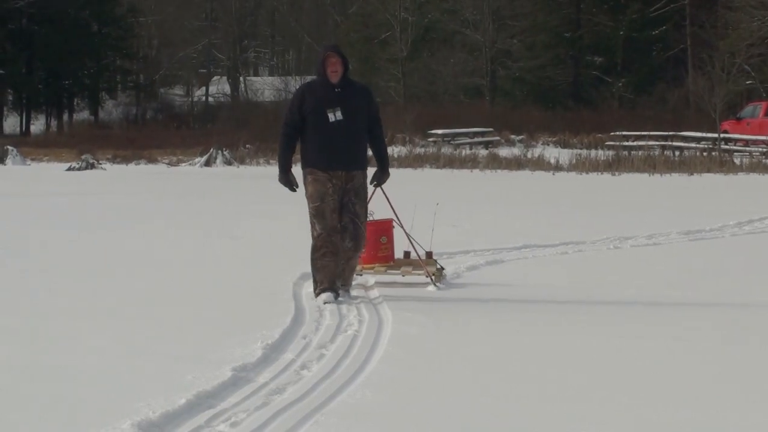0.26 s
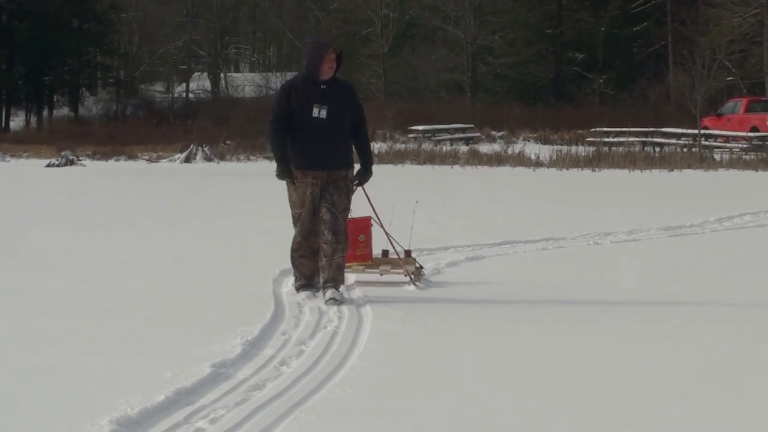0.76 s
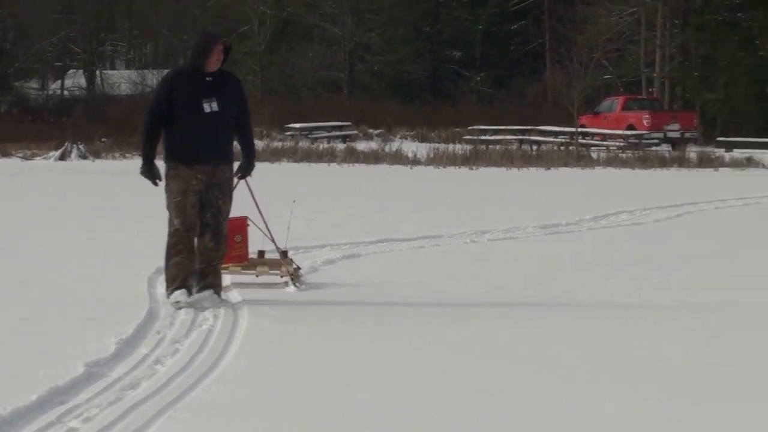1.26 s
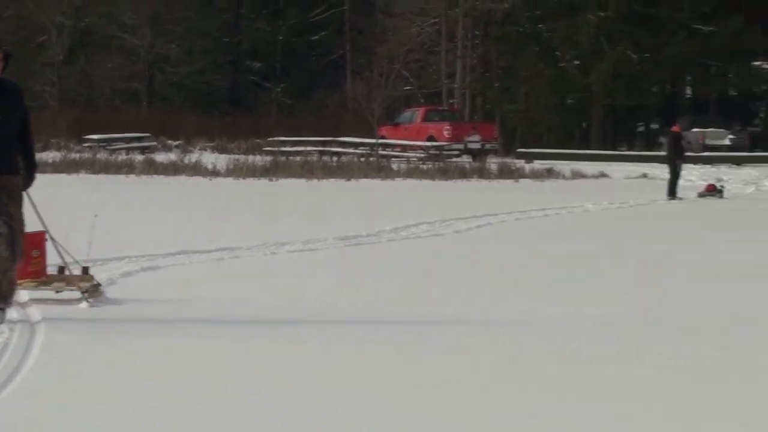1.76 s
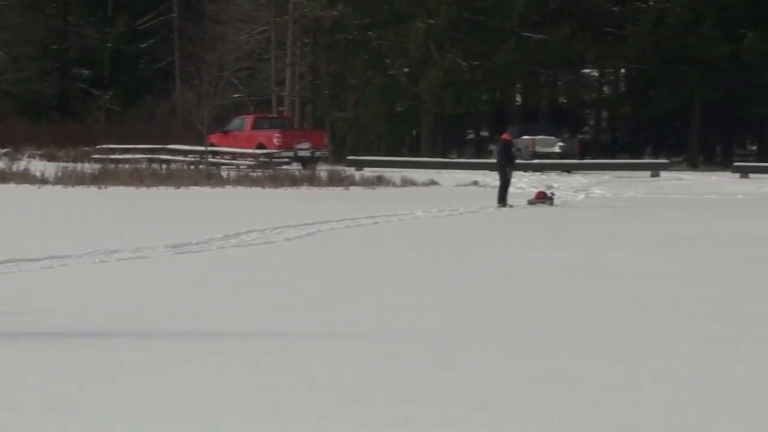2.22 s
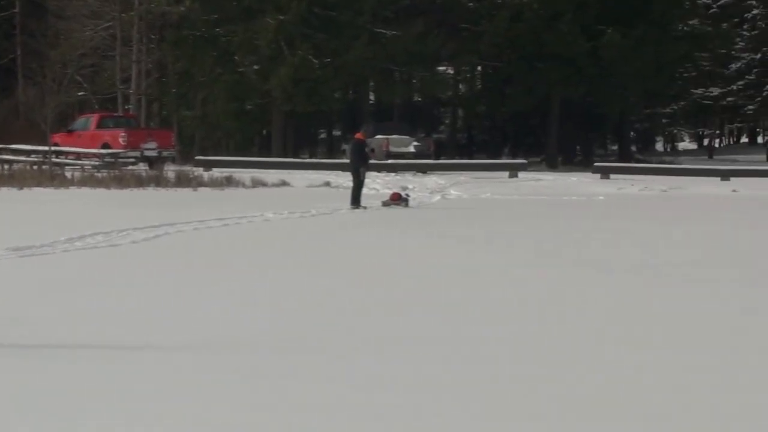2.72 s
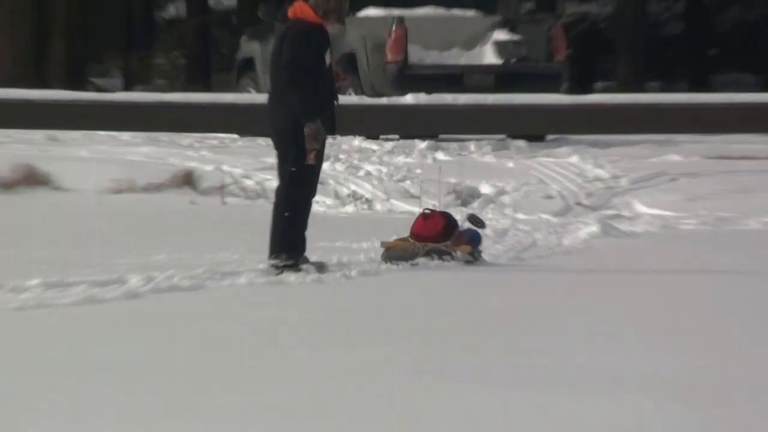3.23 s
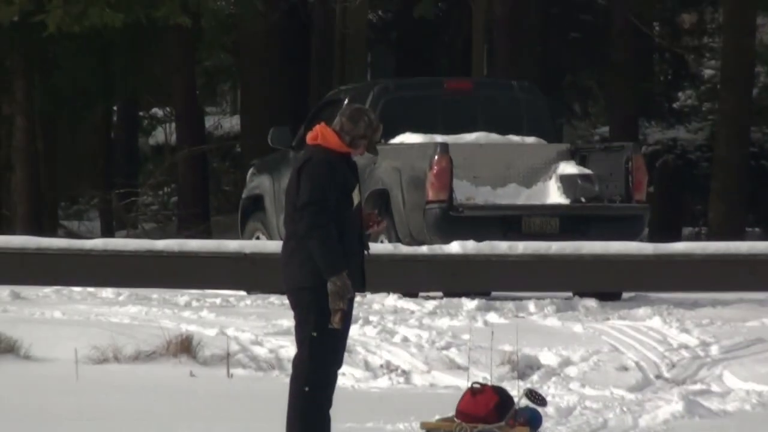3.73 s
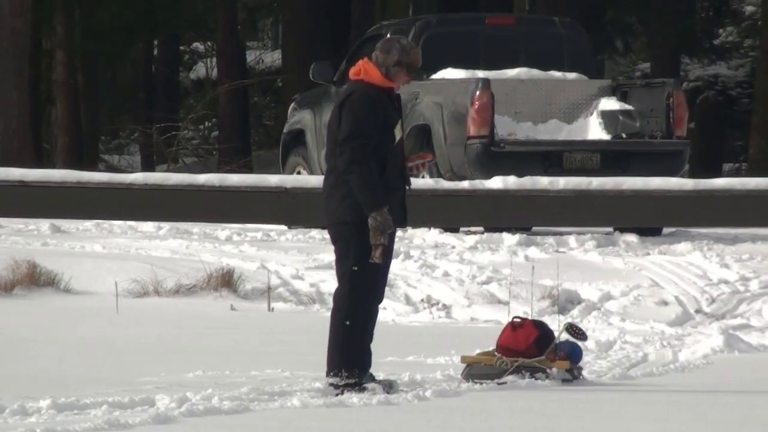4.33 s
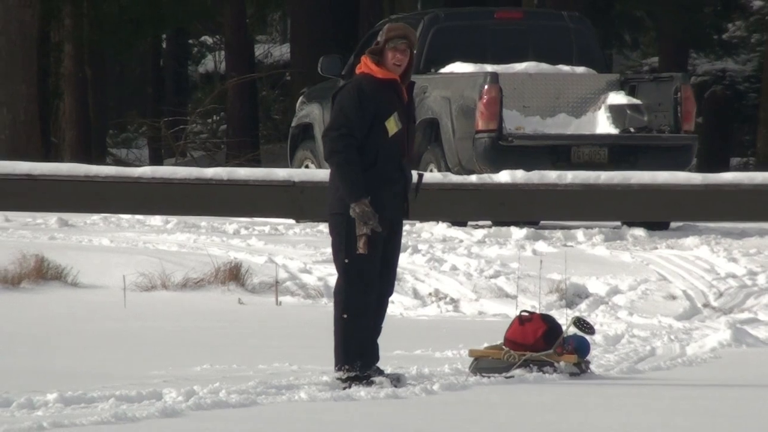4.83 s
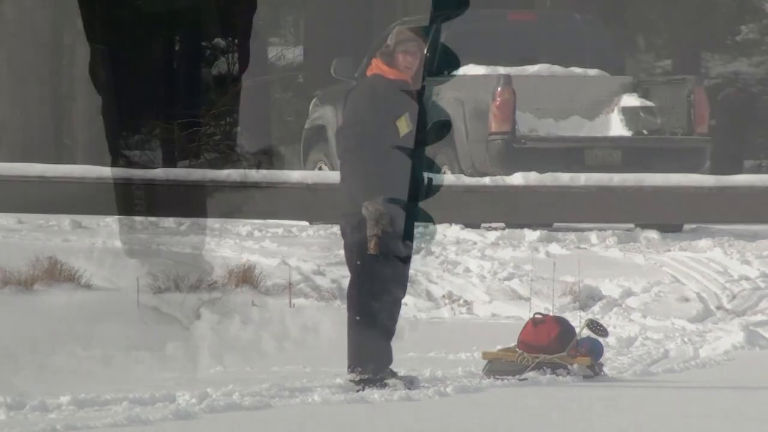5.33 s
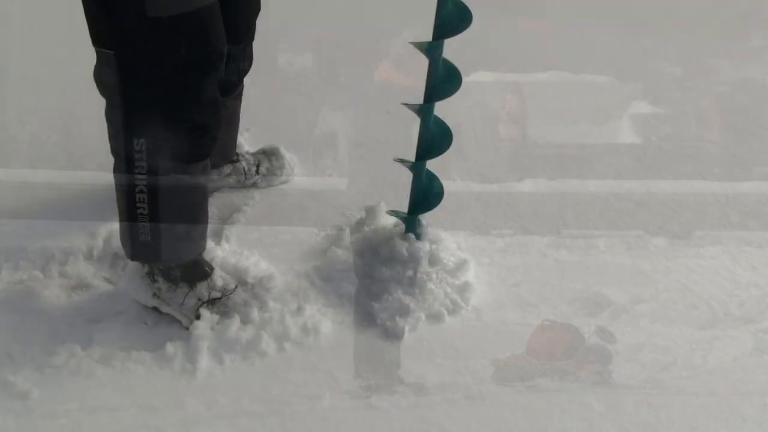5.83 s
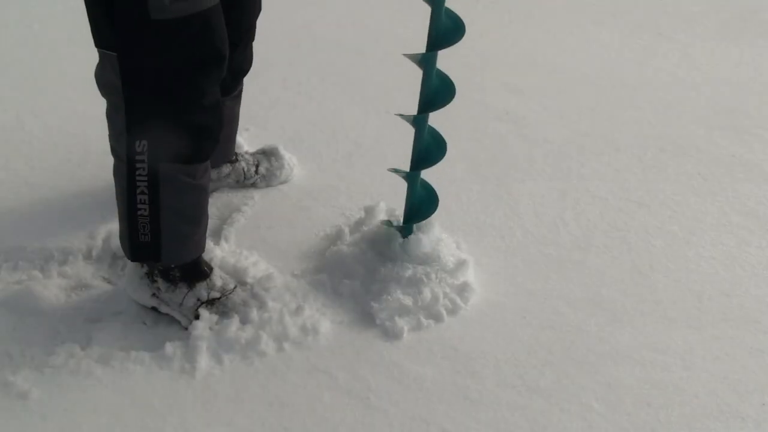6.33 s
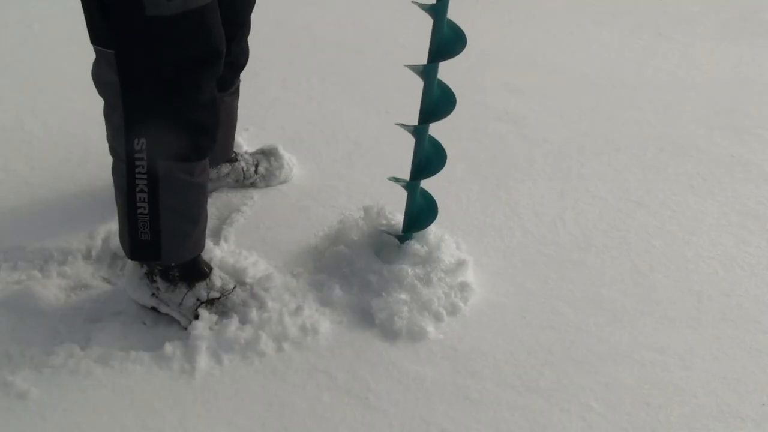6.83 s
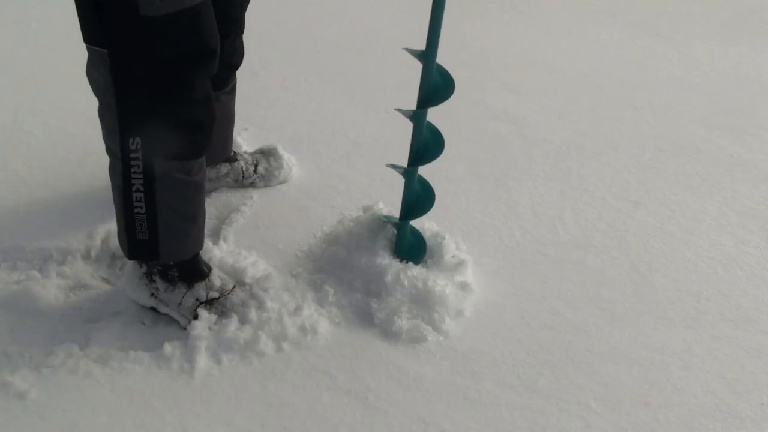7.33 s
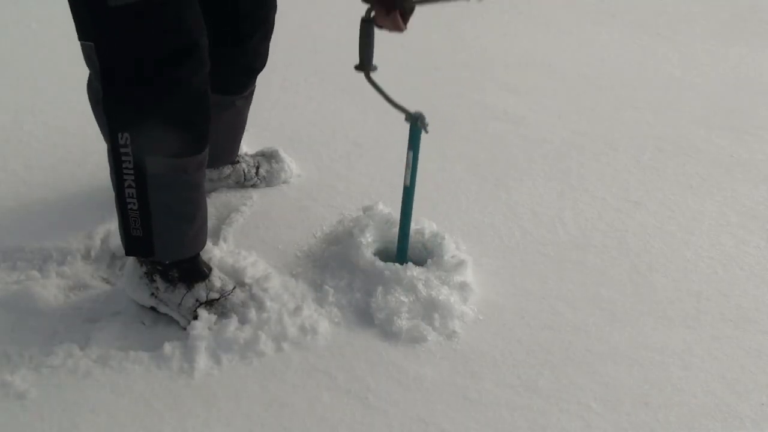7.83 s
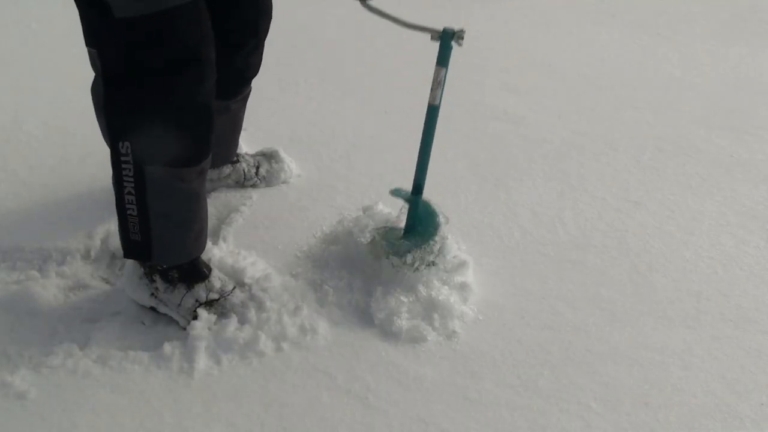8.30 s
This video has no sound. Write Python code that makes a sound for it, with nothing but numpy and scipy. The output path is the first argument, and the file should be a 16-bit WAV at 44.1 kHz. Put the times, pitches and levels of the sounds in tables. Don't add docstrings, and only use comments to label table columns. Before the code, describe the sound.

Outdoors on a frozen lake, very quiet air with soft low wind buffeting on the microphone, a thin whine and tiny plastic ticks. Around five seconds a close hand auger fades in, scraping ice with a bright hiss and uneven metallic ringing. It breaks through, slush gulps, blades rub the rim, and it finally rattles out in a loud gush of water.

```python
import sys
import numpy as np
from scipy import signal
from scipy.fft import rfft, irfft
from scipy.io import wavfile

SR = 44100
rng = np.random.default_rng(int(sys.argv[2]) if len(sys.argv) > 2 else 0)


def to_linear_factor(level_db):
    exponent = np.asarray(level_db, float) / 20
    return 10 ** exponent


def master_out(mix):
    frames = np.transpose(np.atleast_2d(mix))
    ceiling = np.clip(frames, -1, 1)
    pcm = np.round(ceiling * 32767).astype(np.int16)
    wavfile.write(sys.argv[1], SR, pcm)


N = 377496

# (time [s], share [0-1])
FAR_FADE = [(5.0, 0.29), (6.0, 0.21), (7.0, 0.16), (7.6, 0.038)]

# (time [s], spread [s], thump [dB], deep push [dB])
GUSTS = [(0.03, 0.091, -41.5, -49), (.3, 0.15, -52, -68), (.55, 0.089, -45, -47), (.93, 0.04, -31, -44),
         (1.18, 0.067, -40.5, -33.5), (1.31, 0.025, -41, -53), (1.43, 0.11, -32.5, -36),
         (1.68, 0.16, -28.5, -35), (2.2, 0.08, -39, -37.5), (2.33, 0.15, -32, -36), (2.6, 0.14, -41, -45),
         (2.86, 0.12, -40.5, -54), (3.15, 0.16, -39.5, -46), (3.4, 0.23, -36.5, -37.5),
         (3.59, 0.047, -35, -47), (3.71, 0.046, -25.5, -42), (4.07, 0.15, -35.5, -41),
         (4.29, 0.04, -40, -34.5), (4.48, 0.093, -36.5, -38.5), (4.68, 0.18, -44, -53),
         (4.78, 0.19, -30.5, -39), (5.0, 0.21, -36, -36), (5.15, 0.033, -43, -41), (5.33, 0.044, -32, -37),
         (5.6, 0.24, -37, -48), (6.3, 0.25, -36, -58), (6.95, 0.24, -35.5, -55)]
CALM_DB = -52
UPPER_DB, UPPER_GROWTH = -51.5, 1.16
# (frequency [Hz], level [dB per Hz])
AIR_COLOUR = [(120, -39), (200, -3.5), (372, -5), (550, -5.5), (786, -6.5), (1890, -11), (2550, -13.5),
              (15700, -30.5)]
AIR_DB = -49
# (time [s], spread [s], cloth [dB], nearby shuffle [dB])
STIRS = [
    (0.0, 0.064, -62, -51),
    (1.109, 0.015, -82, -52),
    (1.27, 0.071, -80, -51),
    (1.9, 0.19, -63, -53),
    (2.26, 0.037, -59, -55),
    (2.53, 0.17, -58, -58),
    (3.05, 0.05, -61, -54),
    (3.5, 0.19, -59, -47.5),
    (3.83, .03, -52, -69),
    (4.44, 0.023, -54, -55),
]
WHINE_HZ, WHINE_DB, WHINE_WIDTH_HZ = 2514, -60, 23
# (frequency [Hz], likeness [0-1], left leads by [rad])
PORTS = [(40, 0.67, 0.25), (131, 0.5, 0.7), (305, 0.19, 0.3), (890, 0.14, 2.5), (2830, 0.49, 2.5),
         (8000, 0.4, 1.5), (10900, 0.37, 2), (11600, 0.88, -18)]
# (time [s], peak [dB], low edge [Hz], high edge [Hz], decay [s])
TICKS = [(.933, -37, 902, 1900, 0.011), (1.068, -42, 900, 1500, 0.013), (1.111, -36, 1800, 5500, 0.0087),
         (1.115, -34.5, 604, 1060, 0.018), (1.243, -29, 900, 2520, 0.0087), (1.256, -47, 2820, 4530, .008),
         (1.278, -33, 930, 2500, 0.022), (1.306, -29.5, 930, 2560, 0.0095), (1.307, -41, 1900, 2800, 0.01),
         (1.365, -49, 554, 850, 0.011), (1.381, -44, 1000, 2500, .01), (1.41, -37, 605, 1600, 0.023),
         (1.639, -43, 898, 1500, 0.0089), (1.532, -47, 1500, 4200, 0.008), (1.854, -41, 906, 1500, 0.011),
         (1.95, -45, 1800, 6000, 0.012), (1.985, -45, 900, 2400, 0.01), (2.36, -46, 1000, 2800, 0.01),
         (3.016, -35, 950, 1700, 0.012), (3.017, -29.5, 490, 1110, 0.014), (3.376, -34, 2500, 12900, 0.012),
         (3.379, -26, 816, 2700, 0.022), (3.378, -31, 1540, 2780, 0.016), (3.464, -36, 600, 1700, .01)]

# (time [s], spread [s], slush [dB], trickle [dB], air pocket pitch [Hz])
SURGES = [(7.18, 0.074, -28, -47, 426), (7.32, 0.16, -18.5, -42, 475), (7.42, 0.065, -23, -24.5, 503),
          (7.5, 0.02, -28, -33, 403), (7.82, 0.018, -44, -31, 335), (7.634, 0.022, -24.5, -23, 410),
          (7.73, 0.022, -40, -25.5, 711), (8.038, 0.061, -17, -20, 450), (8.272, 0.051, -20, -24.5, 470),
          (8.404, 0.056, -23, -19, 534), (8.56, 0.042, -28, -23.5, 780)]
WET_FROM_S, DRIP_DB = 7.08, -34.5
# (time [s], peak [dB], pitch [Hz])
GULPS = [(7.15, -15, 400), (7.208, -13.5, 390), (7.242, -12.5, 380), (7.258, -13, 420), (7.352, -10, 400),
         (7.434, -14, 460), (7.5, -16, 383), (7.288, -7.5, 517), (7.31, -12, 397), (7.386, -4.5, 562),
         (8.004, -8, 404), (8.022, -9, 565), (8.042, -10, 414), (8.115, -12.5, 310), (8.197, -9.5, 710),
         (8.272, -9, 565), (8.286, -7.5, 606), (8.55, -12.5, 820)]
# (time [s], spread [s], level [dB], pitch [Hz])
HEAVES = [
    (7.41, 0.056, -28, 110),
    (7.54, 0.029, -35, 160),
    (7.75, 0.1, -48, 80),
    (8.0, 0.064, -46, 200),
    (8.13, 0.052, -43, 200),
    (8.27, 0.036, -32, 170),
    (8.41, 0.031, -44, 200),
]

# (time [s], peak [dB], decay [s], ring [dB])
RATTLE = [(8.2023, -18, 0.011, -10), (8.2415, -8.5, 0.014, -5), (8.2485, -7, 0.023, -3),
          (8.2992, -2.5, 0.03, -6.5), (8.3145, -6, 0.02, -5), (8.3275, -5, 0.025, -4),
          (8.3406, -10, 0.02, 3), (8.3563, -11, 0.022, 5), (8.3682, -4.5, 0.02, 1), (8.3885, -2, 0.023, -4),
          (8.4069, -9, 0.016, 2), (8.417, -7, 0.014, -3), (8.428, -1, 0.02, -5), (8.433, -4, 0.017, -8),
          (8.454, -2, 0.017, -6), (8.4847, -7.5, 0.02, -2), (8.496, -18, 0.02, 6), (8.507, -13, 0.012, 3),
          (8.514, -18, 0.02, 6), (8.526, -13, 0.017, 3), (8.534, -10, 0.018, 5), (8.539, -12, 0.026, 3),
          (8.548, -15, 0.027, 5)]
# (frequency [Hz], width [Hz], level [dB])
FLIGHT_NOTE = [(3240, 35, 1.5), (3460, 60, -5)]
# (frequency [Hz], width [Hz], level [dB])
WET_STEEL = [(1500, 110, -16), (5340, 300, -12), (6850, 300, 2), (7700, 600, 1), (9400, 400, -16)]

# (time [s], length [s], hiss [dB], ring pitch [Hz], ring [dB])
RUBS = [(7.345, 0.028, -17, 1300, -31), (7.381, 0.006, -17, 500, -27), (7.39, 0.016, -20.5, 2270, -26),
        (7.438, 0.016, -18, 1300, -25), (7.462, 0.017, -15.5, 2830, -39), (7.478, 0.012, -20, 2000, -33),
        (7.498, 0.027, -11, 2050, -38), (7.525, 0.045, -21, 1900, -24), (7.584, 0.0034, -29, 8300, -32),
        (7.611, 0.021, -19, 6350, -33), (7.627, 0.034, -19.5, 3150, -25), (7.704, 0.03, -20, 2020, -26),
        (7.725, 0.024, -19.5, 1310, -28), (7.817, 0.0072, -18, 1290, -21), (7.848, 0.0074, -21, 2510, -23),
        (7.858, 0.014, -16, 2210, -21), (7.898, 0.006, -31, 2000, -33), (7.912, 0.008, -29, 1250, -32),
        (7.95, 0.011, -27, 1850, -23.5), (7.967, 0.013, -24, 2200, -28), (7.991, 0.0073, -25, 1900, -22),
        (8.024, 0.026, -36, 1820, -20), (8.059, 0.013, -19.5, 2510, -18), (8.11, 0.018, -49, 1300, -26),
        (8.196, 0.006, -27, 1000, -19.5), (8.227, 0.022, -28, 1500, -26.5), (8.388, 0.041, -21, 1320, -20),
        (8.478, 0.01, -18.5, 6500, -30), (8.502, 0.032, -34, 1580, -23), (8.534, 0.018, -22.5, 3400, -26.5)]
# (frequency [Hz], level [dB per Hz])
RUB_COLOUR = [(240, -26), (400, -5.5), (945, -14.5), (1260, -5), (2300, -6), (6840, -7), (11200, -8),
              (15700, -20.5)]
# (frequency [Hz], width [Hz], level [dB])
RIM_STEEL = [(1250, 130, 2), (1900, 90, 2), (2208, 80, 0.5), (2510, 80, -6), (3106, 180, -1.5),
             (3810, 150, -5), (5040, 200, -8), (6100, 200, 0), (7000, 200, -8), (7200, 180, -4),
             (8310, 250, -6), (9530, 250, -5), (11600, 250, -15), (12300, 250, -13)]

# (time [s], spread [s], extra hiss [dB], extra ring [dB])
PUSHES = [
    (5.25, 0.068, -25, -21),
    (5.559, 0.095, -19, -11),
    (5.87, 0.088, -24.5, -18),
    (6.179, 0.18, -20.5, -15.5),
    (6.5, 0.046, -25, -21),
    (6.75, 0.15, -20.5, -17),
    (6.981, 0.048, -26, -14),
    (7.292, 0.021, -19, -24),
]
HISS_DB, RING_DB, HUM_DB = -25, -22, -27.5
AUGER_IN_S, AUGER_FULL_S = 5.003, 5.887
BREAK_S, BREAK_DB_PER_S = 7.42, 400
STEEL_DAMPED_S, DAMP_DB_PER_S = 7.17, 42
# (frequency [Hz], level [dB per Hz])
SHAVING_COLOUR = [(320, -19.5), (640, -10), (867, -14.5), (1200, -1.5), (1440, -6.5), (4340, -15),
                  (11300, -15), (15700, -24.5)]
# (time [s], peak [dB])
SNAGS = [(5.2367, -23.5), (5.3151, -18.5), (5.461, -20), (5.4927, -15), (5.693, -13), (5.7241, -16.5),
         (5.8369, -13), (6.011, -8), (6.056, -9), (6.1572, -11), (6.196, -6.5), (6.301, -20), (6.458, -5.5),
         (6.509, -11.5), (6.6071, -6.5), (6.847, -7.5), (6.8965, -10), (6.9884, -7), (7.034, -9),
         (7.0875, -7.5), (7.116, -11), (7.169, -14), (7.2068, -17)]
# (frequency [Hz], width [Hz], level [dB])
SHAFT = [(200, 67, -9.5), (387.4, 30, -0.5), (533, 81, -8.5), (710.4, 24, 3.5), (800, 44, -12)]
# (frequency [Hz], width [Hz], level [dB])
BLADE = [(978, 47, 12), (1070, 67, 11.5), (1196, 58, 11.5), (1322, 24, 13.5), (1584, 77, 7),
         (1700, 44, 3.5), (1985, 47, 6.5), (2280, 68, 10), (2500, 120, 7), (3150, 180, 7), (3560, 250, 6)]
# (frequency [Hz], width [Hz], level [dB])
EDGE = [(4850, 72, -11), (5470, 45, -8), (5660, 55, 3), (5920, 190, -5), (6130, 60, -6), (6430, 95, -8),
        (6830, 60, -8)]

# (frequency [Hz], left minus right [dB])
LEAN = [(110, -1), (200, -8.5), (550, -12), (1290, -6.5), (2380, -5), (4400, -2), (8120, -4.5),
        (15000, -0.5)]
# (frequency [Hz], likeness [0-1])
LIKENESS = [(100, 0.69), (300, 0.97), (1000, 0.98), (4000, 0.98), (9000, 0.94), (10800, 0.77),
            (11500, 0.99)]


def rms_one(x):
    return x / np.sqrt(np.mean(x ** 2) + 1e-20)


def in_time(s, values):
    return np.interp(np.arange(N) / SR, s, values)


def swells(s, spread_s, db, rest_db):
    clock = np.arange(0, N / SR + .01, .002)
    power = to_linear_factor(2 * rest_db)
    for at, wide, top in zip(s, spread_s, db):
        power = power + to_linear_factor(2 * (top - 10 * np.abs(clock - at) / wide))
    return in_time(clock, 10 * np.log10(power))


def decays(rows, decay_s):
    env = np.zeros(N)
    for (s, db), length in zip(rows, decay_s):
        at = round(s * SR)
        env[at:] += to_linear_factor(db - 60 * np.minimum(np.arange(N - at) / SR / length, 4))
    return env


def drift(rate):
    r = np.exp(-32 * np.pi * rate / SR)
    slow = signal.lfilter([1], [1, -2 * r, r * r], rng.standard_normal(N // 16 + 3002))[3000:]
    return np.interp(np.arange(N) / 16, np.arange(len(slow)), rms_one(slow))


def grains(per_s, spread_db):
    sizes = to_linear_factor(spread_db * np.minimum(rng.exponential(1, N), 5)) * rng.choice([-1, 1], N)
    return rms_one(sizes * (rng.random(N) < per_s / SR))


def at_hz(points, column=1):
    hz = np.maximum(np.fft.rfftfreq(N, 1 / SR), 1)
    points = np.array(points)
    return np.interp(np.log(hz), np.log(points[:, 0]), points[:, column])


def coloured(x, spectrum):
    return rms_one(irfft(rfft(x) * to_linear_factor(at_hz(spectrum)), N))


def band_pass(x, low_hz, high_hz, order=2):
    return signal.sosfilt(signal.butter(order, [low_hz, high_hz], "band", fs=SR, output="sos"), x)


def band(x, low_hz, high_hz):
    return rms_one(band_pass(x, low_hz, high_hz))


def resonance(x, hz, width_hz):
    r = np.exp(-np.pi * width_hz / SR)
    poles = [1, -2 * r * np.cos(2 * np.pi * hz / SR), r * r]
    return signal.lfilter(np.array([1, 0, -1]) * (1 - r * r) / 2, poles, x + 1e-18)


def body(x, modes, patchy_db=0, rate=8):
    out = np.zeros(N)
    for k, (hz, width, db) in enumerate(modes):
        fed = x * to_linear_factor(patchy_db * drift(rate))
        out += (-1) ** k * to_linear_factor(db) / np.sqrt(width) * resonance(fed, hz, width)
    return out


def wind(white, thump_db, deep_db):
    lumps = to_linear_factor(2.4 * drift(28))
    upper_db = UPPER_DB + UPPER_GROWTH * (thump_db + 40.5)
    deep = to_linear_factor(deep_db) * band(white[0], 13.0, 55.0)
    upper = to_linear_factor(upper_db + 1.5) * rms_one(lumps * band(white[2], 134, 271))
    bursts = white[1] + 0.81 * grains(45, spread_db=2.5)
    thump = to_linear_factor(thump_db) * rms_one(lumps * band(bursts, 79.0, 129.7))
    return deep + upper + thump


def motor_tone():
    phase = 2 * np.pi * WHINE_HZ * np.arange(N) / SR + 2.2 * drift(3.3)
    return np.sin(phase) * to_linear_factor(2.5 * drift(2.7))


def ticks():
    out, span = np.zeros(N), np.arange(SR // 10) / SR
    noise = rng.standard_normal((len(TICKS), len(span)))
    for (s, db, low_hz, high_hz, decay_s), white in zip(TICKS, noise):
        burst = (1.4 * (span == 0) + 0.43 * white) * to_linear_factor(-30 * span / decay_s)
        tick = band_pass(burst, low_hz, high_hz, order=3)
        ring_gain = 4.0 * min(1, (900 / low_hz) ** 2)
        tick += ring_gain * resonance(tick, 1.16 * low_hz, 0.27 * low_hz)
        at = round((s + 0.00039) * SR)
        out[at:at + len(span)] += to_linear_factor(db + 8.5) * tick / np.abs(tick).max()
    return out


def far_scene():
    s, spread_s, thumps, pushes = np.transpose(GUSTS)
    thump_db = swells(s, spread_s, thumps, CALM_DB)
    deep_db = swells(s, 1.9 * spread_s, pushes, CALM_DB)
    s, spread_s, cloth, shuffle = np.transpose(STIRS)
    air_db = swells(s, 4.7 * spread_s, shuffle, AIR_DB)
    rustle_db = swells(s, spread_s, cloth, -95)
    tone = motor_tone()
    pair = []
    for side in range(2):
        white = rng.standard_normal((4, N))
        air = to_linear_factor(air_db + 2.5) * coloured(white[3], AIR_COLOUR)
        rustle = to_linear_factor(rustle_db) * band(white[2], 3500, 13000)
        breath = 0.74 * rms_one(resonance(white[0], WHINE_HZ, WHINE_WIDTH_HZ))
        whine = to_linear_factor(WHINE_DB) * (tone + breath)
        pair.append(rfft(wind(white, thump_db, deep_db) + air + rustle + whine))
    alike = np.clip(at_hz(PORTS), 0, 1)
    lag = np.exp(-1j * at_hz(PORTS, column=2))
    right = alike * lag * pair[0] + np.sqrt(1 - alike ** 2) * pair[1]
    return to_linear_factor(6.0) * irfft([pair[0], right], N) + ticks()


def bubbles(per_s, pitches, sharpness, weight):
    clicks, dealt = grains(per_s, spread_db=3.5), rng.integers(0, len(pitches), N)
    return sum(resonance(clicks * (dealt == k) * weight(hz), hz, hz / sharpness)
               for k, hz in enumerate(pitches))


def gulps():
    out, clock = np.zeros(N + SR), np.arange(SR // 10) / SR
    shape = np.minimum(clock / 0.0025, 1) * to_linear_factor(-60 * clock / 0.026)
    for s, db, hz in GULPS:
        at = round(s * SR)
        out[at:at + len(clock)] += to_linear_factor(db) * shape * np.sin(2 * np.pi * hz * clock * (1 + 1.2 * clock))
    return out[:N]


def heaves():
    white, out = rng.standard_normal(N), np.zeros(N)
    for s, spread_s, db, hz in HEAVES:
        boom = resonance(resonance(white, hz, 0.8 * hz), hz, 0.8 * hz)
        out += to_linear_factor(swells([s], [spread_s], [db], -90)) * rms_one(boom)
    return out


def water():
    s, spread_s, slushes, trickles, pitches_hz = np.transpose(SURGES)
    dry_db = -400 * np.maximum(WET_FROM_S - np.arange(N) / SR, 0)
    slush_db = dry_db + swells(s, spread_s, slushes, -60)
    trickle_db = dry_db + swells(s, spread_s, trickles, DRIP_DB)
    pocket_hz = np.maximum(in_time(s, pitches_hz), 100)

    def near_pocket(hz):
        return np.exp(-(np.log(hz / pocket_hz) / 0.45) ** 2) * (hz / 500) ** -.8

    slush = bubbles(350, np.geomspace(260, 900, 11), 7.3, near_pocket)
    trickle = bubbles(9000, np.geomspace(700, 12000, 14), 0.87, lambda hz: (hz / 1000) ** -1.1)
    spray_db = dry_db - 41.5 + 0.16 * (trickle_db + 33.5)
    out = to_linear_factor(spray_db) * band(grains(17000, spread_db=1.0), 4900, 12600)
    out += to_linear_factor(slush_db - 4.5) * rms_one(slush) + gulps()
    return out + to_linear_factor(trickle_db) * rms_one(trickle) + to_linear_factor(dry_db) * heaves()


def rattle():
    s, db, decay_s, ring_db = np.transpose(RATTLE)
    white = rng.standard_normal(N)
    knocks = white * (decays(zip(s, db), decay_s) + 1.8 * decays(zip(s, db), 0.18 * decay_s))
    crack = band_pass(knocks, 2200, 11500)
    note = body(white * decays(zip(s, db + ring_db), 0.5 * decay_s), FLIGHT_NOTE)
    steel = body(knocks, WET_STEEL, patchy_db=4.0, rate=55)
    return to_linear_factor(-7.5) * crack + to_linear_factor(32.5) * note + to_linear_factor(16.5) * steel


def rubs():
    hiss, rings = np.zeros(N), np.zeros(N)
    chips = grains(6000, spread_db=3.0) * to_linear_factor(2.2 * drift(94))
    clock = np.arange(SR // 5) / SR
    for s, length, hiss_db, hz, ring_db in RUBS:
        at = round(s * SR)
        shape = np.clip(clock / (0.34 * length), 0, 1) * to_linear_factor(-1500 * np.maximum(clock - length, 0))
        burst = chips[at:at + len(clock)] * shape[:N - at]
        hiss[at:at + len(clock)] += to_linear_factor(hiss_db) * burst
        width = 45 + 0.069 * hz
        ring_gain = to_linear_factor(ring_db) * np.sqrt(SR / np.pi / width)
        rings[at:at + len(clock)] += ring_gain * resonance(burst, hz, width)
    level = np.sqrt(np.mean(hiss ** 2))
    steel = to_linear_factor(-1.5) * rms_one(body(hiss, RIM_STEEL, patchy_db=4.5, rate=13.4))
    ice = to_linear_factor(-2.5) * band(coloured(hiss, RUB_COLOUR), 250, 21300)
    return level * (ice + steel) + rings


def shaving(chips):
    sizes = [(hz, 0.3 * hz, 10 * np.log10(hz)) for hz in np.geomspace(300, 13000, 11)]
    return coloured(body(chips, sizes, patchy_db=1.54, rate=16.4), SHAVING_COLOUR)


def snags(chips):
    return to_linear_factor(-9.5) * decays(SNAGS, np.full(len(SNAGS), .06)) * band(chips, 1200, 5900)


def cutting():
    s, spread_s, hisses, rings = np.transpose(PUSHES)
    clock = np.arange(N) / SR
    share = np.clip((clock - AUGER_IN_S) / (AUGER_FULL_S - AUGER_IN_S), 1e-6, 1)
    heard_db = 20 * np.log10(share) - BREAK_DB_PER_S * np.maximum(clock - BREAK_S, 0)
    steel_db = heard_db - DAMP_DB_PER_S * np.maximum(clock - STEEL_DAMPED_S, 0)
    hiss_db = heard_db + swells(s, spread_s, hisses, HISS_DB)
    ring_db = steel_db + swells(s, spread_s, rings, RING_DB)
    edge_db = 0.6 * hiss_db - 19 + 0.38 * heard_db
    bite = to_linear_factor(0.72 * drift(2.85) + 1.0 * drift(38))
    chips = rms_one(bite * grains(9000, spread_db=2.8))
    shocks = rms_one(bite * grains(9000, spread_db=2.8))
    hiss = to_linear_factor(hiss_db + 1.0) * shaving(chips)
    blade = to_linear_factor(ring_db - 7) * rms_one(body(shocks, BLADE, patchy_db=2.5, rate=18))
    edge = to_linear_factor(edge_db) * rms_one(body(shocks, EDGE, patchy_db=2.2, rate=10.6))
    shaft = to_linear_factor(steel_db + HUM_DB - 3.0) * rms_one(body(shocks, SHAFT, patchy_db=1.5, rate=9.7))
    return hiss + blade + edge + snags(chips) + shaft


def placed(x):
    echoes = rng.standard_normal(SR // 8) * to_linear_factor(-60 * np.arange(SR // 8) / SR / .09)
    alike, lean = at_hz(LIKENESS), to_linear_factor(at_hz(LEAN) / 2)
    direct = rfft(band_pass(x, 70, 15000, order=4))
    scatter = direct * rfft(echoes / np.linalg.norm(echoes), N)
    mid, side = np.sqrt((1 + alike) / 2) * direct, np.sqrt((1 - alike) / 2) * scatter
    return irfft([lean * (mid + side), (mid - side) / lean], N)


def scene():
    fade = in_time(*np.transpose(FAR_FADE))
    auger = cutting() + rubs() + rattle() + water()
    return fade * far_scene() + (fade < 1) * placed(auger)


def top_cut(x):
    return signal.sosfilt(signal.butter(12, 15810, fs=SR, output="sos"), x)


def record(dry):
    rounded = .95 * np.tanh(dry / .95)
    finished = signal.sosfilt(signal.cheby2(10, 60, 16500, fs=SR, output="sos"), rounded)
    return top_cut(finished)


dry = scene()
out = record(dry)
master_out(out)
```